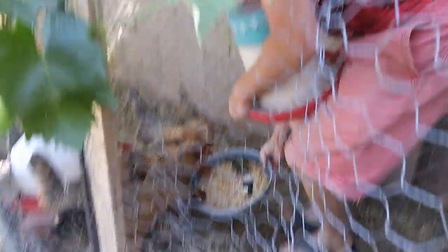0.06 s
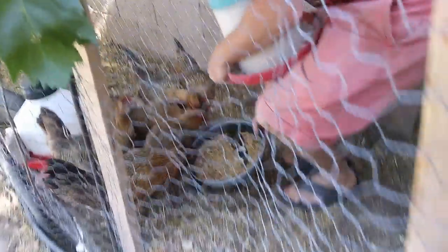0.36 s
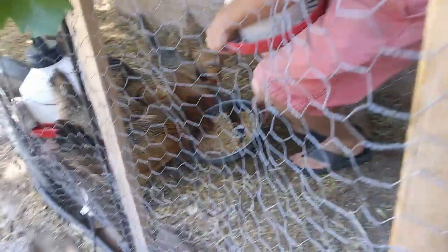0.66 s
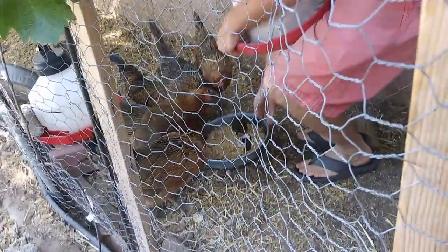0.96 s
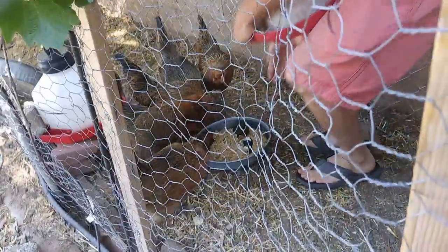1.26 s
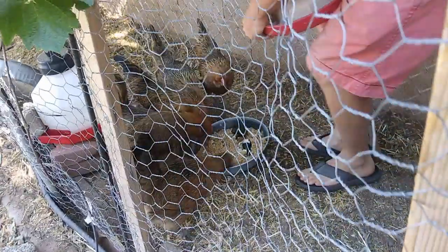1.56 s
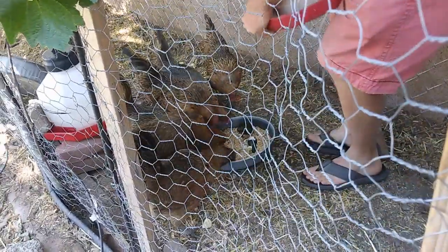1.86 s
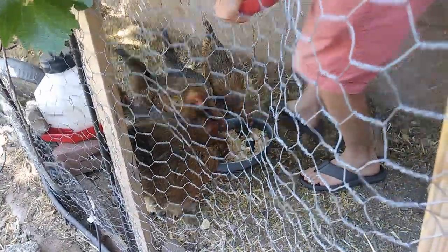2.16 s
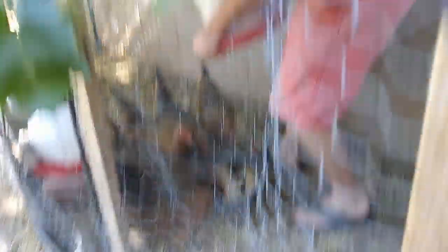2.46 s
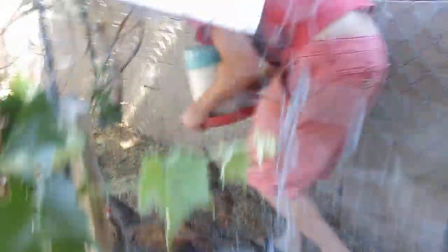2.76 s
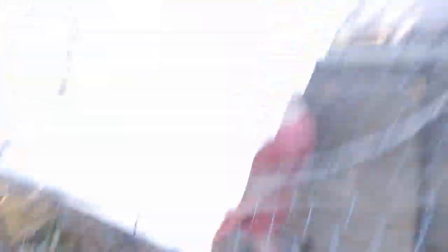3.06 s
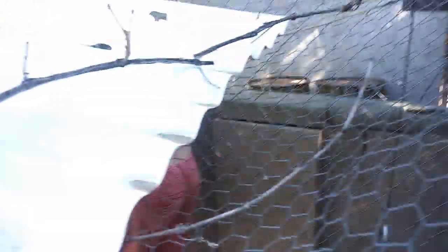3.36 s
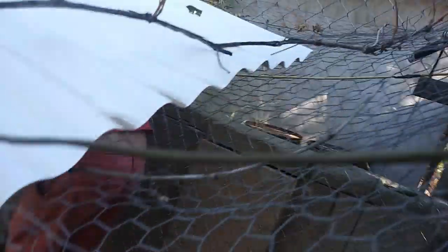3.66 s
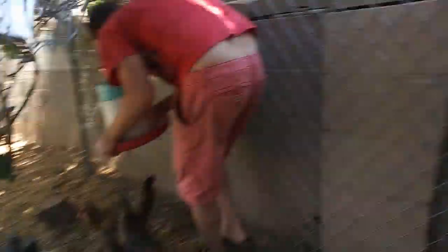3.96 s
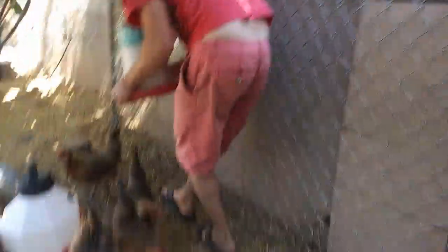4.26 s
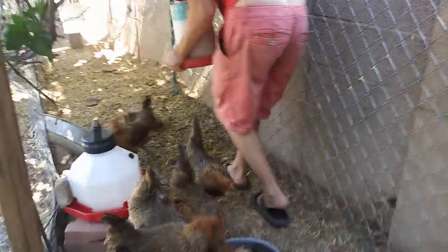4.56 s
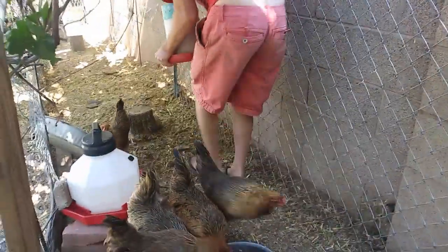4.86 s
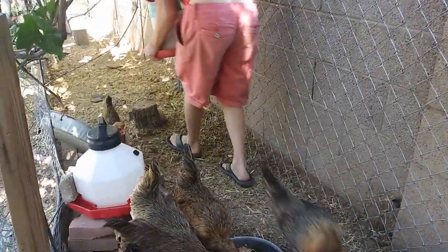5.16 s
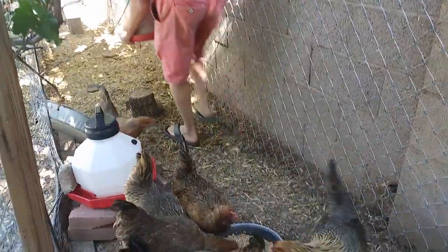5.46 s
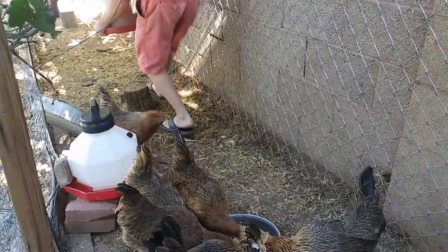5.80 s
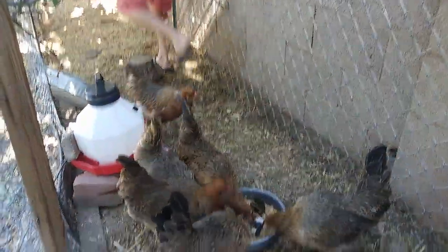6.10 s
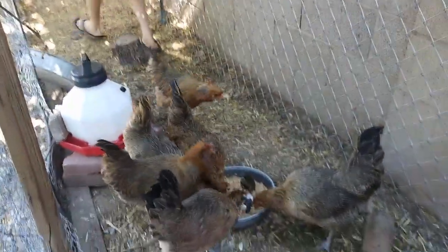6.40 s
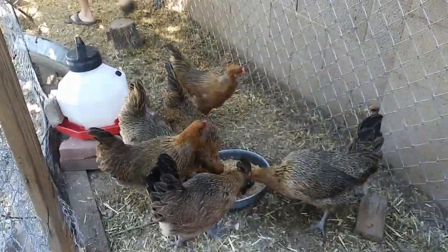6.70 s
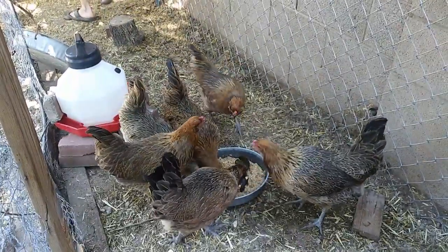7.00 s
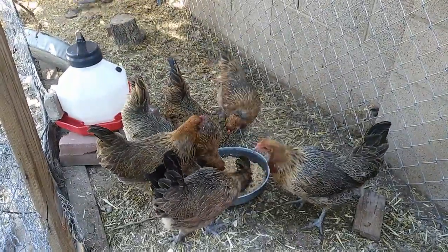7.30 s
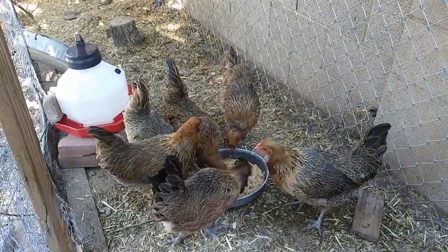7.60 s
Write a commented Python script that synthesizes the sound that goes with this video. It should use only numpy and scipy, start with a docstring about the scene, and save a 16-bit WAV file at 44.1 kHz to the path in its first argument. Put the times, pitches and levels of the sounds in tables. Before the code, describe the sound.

Scattered sharp taps, light pecking and thin chicken peeps outdoors, as sandals shuffle on dry straw and wire mesh rattles once.

```python
"""Young chickens feeding in a wire run

Beaks peck at grain and click on a bowl beside a block wall; the birds peep faintly and one clucks.
Sharp taps come from beaks and from the sandals of someone who shuffles off over crackling straw.
Halfway through, the wire fence rattles against the microphone.
Behind it all, a soft outdoor rush swells and sinks."""
import sys
import numpy as np
from scipy import signal
from scipy.fft import rfft, irfft, next_fast_len
from scipy.io import wavfile

SR = 44100
rng = np.random.default_rng(int(sys.argv[2]) if len(sys.argv) > 2 else 0)


def store_pcm(level_fs):
    """Save levels as 16-bit WAV."""
    pcm = np.round(np.clip(level_fs, -1, 1) * 32767).astype(np.int16)
    wavfile.write(sys.argv[1], SR, np.atleast_2d(pcm).T)


N = 345744
CUTOFF_HZ = 16000

# Each row: start in seconds, level in dB, brightness in dB per octave, lower and upper ring in Hz,
# and scattered sound compared with direct sound in dB.
TAPS = [(0.3994, -31, -1.1, 1630, 2620, -8.5), (0.5, -60, .3, 2460, 3460, 10),
        (1.0296, -38.5, 0.2, 1540, 3740, 8), (1.193, -45, -1.5, 1520, 3120, 1),
        (1.2051, -43.5, 3, 3130, 4380, -3), (2.4056, -50.5, -0.6, 1580, 3540, 18),
        (2.511, -56.5, 5, 2720, 3830, 18), (2.751, -46, 1, 3160, 4680, 6.5),
        (4.131, -55.5, -6.5, 900, 1380, 1), (5.2394, -33.5, 4.5, 2800, 3970, 7),
        (5.823, -48, -1.5, 730, 2000, 13), (6.372, -55, 5.5, 3130, 4260, 16),
        (6.5688, -46, 0.7, 1170, 3670, 0), (6.5721, -45, -1.1, 2960, 3600, -4),
        (7.586, -47.5, -1.9, 2680, 3560, 7)]
# The run's own resonances. Each row: pitch in Hz, width in Hz, strength in dB.
RUN_RESONANCES = [(873, 140, 7.5), (5020, 210, -3), (6950, 490, 2.5)]
# A tap's thud, clack, snap and crack (low to high), in dB.
TAP_SHAPE_DB = [-1, 0.4, 0.5, -7.5]


def taps(scatter_rise_s=0.00056, scatter_fade_s=0.064, tail_fade_s=0.18, tail_db=-21, bounce_s=0.0019):
    """A beak or sandal strikes: the thing hit rings, and the click bounces off ground, wall and coop."""
    out, t = np.zeros(N), np.arange(SR // 4) / SR
    for start, db, brightness_db, low_hz, high_hz, scatter_db in TAPS:
        build_up = 1 - np.exp(-t / (scatter_rise_s * from_db(scatter_db)))
        scatter = unit_energy(grains(14000, 0.55, len(t)) * build_up * fade(t, scatter_fade_s))
        tail = unit_energy(band(rng.standard_normal(len(t)), 220, 6700) * fade(t, tail_fade_s))
        scatter[round(bounce_s * SR * from_db(rng.uniform(-2, 2)))] += .45   # the ground bounce
        force = from_db(scatter_db) * add_resonances(scatter + from_db(tail_db) * tail, RUN_RESONANCES)
        force[0] += 1   # the direct click
        rings = [(hz, hz / 9, 9.2) for hz in (low_hz, high_hz)]
        levels_db = register_levels(db, brightness_db, TAP_SHAPE_DB, (low_hz, high_hz))
        add(out, start, impact(add_resonances(force, rings), levels_db))
    return out


# Hollow things ringing under two of the taps. Each row: pitch in Hz, level in dB, fade in seconds.
DEEP_HOLLOW = [(433, -33, 0.069), (960, -29, 0.04), (1196, -26, 0.043)]
HIGH_HOLLOW = [(973, -31.5, 0.11), (1790, -26, 0.071), (2765, -19, 0.056)]


def hollow_ring(start, tones, rise_s=0.0039):
    """A struck hollow object: its tones build up over a few cycles and die quickly."""
    out, t = np.zeros(N), np.arange(SR // 4) / SR
    ringing = sum(from_db(db) * fade(t, fade_s) * np.sin(2 * np.pi * hz * t) for hz, db, fade_s in tones)
    add(out, start, (1 - np.exp(-t / rise_s)) * ringing)
    return out


# Wire knocks. Each row: start in seconds, level in dB, brightness in dB per octave, fade in seconds.
FENCE_KNOCKS = [(3.9369, -24.5, -0.5, 0.015), (3.946, -37, 1, 0.01), (3.955, -30.5, 1, 0.044),
                (3.966, -37, 1, .036), (3.976, -29, 3.5, 0.018), (3.9781, -26.5, -1.5, 0.007),
                (4.007, -47.5, 3.5, .008)]
# How the fence rings. Each row: pitch in Hz, width in Hz, strength in dB.
FENCE_RESONANCES = [(700, 57, 1), (1160, 300, 4), (2660, 250, 7.5), (7240, 1800, 6.5)]
# A knock's thud, clack, snap and crack, in dB.
KNOCK_SHAPE_DB = [-6, 0, -4, -8]


def fence(drag_db=-23, drag_fade_s=0.093, shiver_db=-47, shiver_fade_s=0.7, zing_hz=10330, zing_db=-55):
    """Wire catches and drags in short dry crunches, then the mesh shivers and a sliding strand sings."""
    out, t = np.zeros(N), np.arange(SR // 2) / SR
    for start, db, brightness_db, fade_s in FENCE_KNOCKS:
        catch_and_drag = fade(t, fade_s) + from_db(drag_db) * fade(t, drag_fade_s)
        force = unit_energy(grains(12000, 2.7, len(t)) * catch_and_drag)
        force[0] += .5
        levels_db = register_levels(db, brightness_db, KNOCK_SHAPE_DB)
        add(out, start, impact(add_resonances(force, FENCE_RESONANCES), levels_db))
    mesh = rms_one(band(rng.standard_normal(len(t)), 560, 2900))
    add(out, 3.98, from_db(shiver_db) * fade(t, shiver_fade_s) * mesh)
    swell = np.hanning(int(0.082 * SR))
    add(out, 4.033, from_db(zing_db) * swell * np.sin(2 * np.pi * zing_hz * t[:len(swell)]))
    return out


# The clearer pecks and cracking stalks. Each row: start in seconds, level in dB, ring in Hz.
PECKS = [(0.167, -37.5, 3460), (0.4786, -40, 7750), (1.1678, -27.5, 3950), (1.4378, -36, 3600),
         (1.4596, -36, 2000), (3.199, -41, 5560), (3.3722, -40, 6700), (3.6283, -36, 2740),
         (3.8873, -38, 2730), (4.5241, -34.5, 4660), (5.084, -42, 8860), (5.6982, -42.5, 4470),
         (5.8007, -39.5, 2470), (5.8418, -35.5, 12500), (6.972, -48, 9500), (7.0263, -43, 6200),
         (7.047, -42, 9000), (7.0711, -37, 9400), (7.1756, -34, 3850), (7.625, -45, 10000)]
# A peck's tone colour. Each row: frequency in Hz, level in dB.
PECK_COLOUR = [(800, -17), (2000, 7.5), (4500, 2.5), (5700, 1.5), (10000, 3), (16000, -7.5)]


def pecks(spill_fade_s=0.069, ring_width_hz=380, ring_db=9):
    """A beak hits the feed: a pitched tick, then a small spill of grain."""
    out, t = np.zeros(N), np.arange(SR // 8) / SR
    for start, db, ring_hz in PECKS:
        spill = unit_energy(grains(4000, 0.81, len(t)) * fade(t, spill_fade_s))
        spill[0] += .25   # the tick
        ringing = add_resonances(spill, [(ring_hz, ring_width_hz, ring_db)])
        add(out, start, 5 * from_db(db - 1) * unit_energy(coloured(ringing, PECK_COLOUR)))
    return out


# Dry, woody clicks. Each row: start in seconds, peak level in dB, ring in Hz.
BOWL_CLICKS = [(0.4928, -32.5, 3200), (3.3605, -39, 1990), (3.4904, -40, 2900), (6.1325, -41, 3300),
               (6.6333, -42, 1650), (6.8738, -39, 1960), (7.071, -40.5, 1600), (7.3402, -40, 1750),
               (7.3897, -44, 1850)]


def bowl_clicks(scatter_db=-2, scatter_fade_s=0.045, ring_db=11):
    """A beak strikes the bare bowl and rings it for a few cycles, with a little scatter after."""
    out, t = np.zeros(N), np.arange(SR // 8) / SR
    for start, db, hz in BOWL_CLICKS:
        force = from_db(scatter_db) * unit_energy(grains(9000, .5, len(t)) * fade(t, scatter_fade_s))
        force[0] += 1
        click = band(add_resonances(force, [(hz, hz / 5, ring_db)]), 1050, 4500)
        add(out, start, from_db(db) * click / np.abs(click).max())
    return out


# Each row: start and length in seconds, first, middle and last pitch in Hz, level in dB.
PEEPS = [(1.38, 0.046, 3800, 4520, 4380, -45), (1.463, 0.034, 3700, 4550, 4300, -46),
         (4.404, 0.08, 2640, 2490, 2570, -57), (4.89, 0.11, 2800, 2660, 2640, -58),
         (5.304, .078, 2750, 2460, 2450, -53.5), (5.501, 0.059, 2180, 2300, 2280, -57.5),
         (5.92, 0.06, 3480, 3160, 2820, -55), (5.983, 0.093, 3200, 2740, 2030, -52),
         (6.087, 0.071, 2510, 2654, 2580, -53.5)]


def peeps(rasp_below_hz=850, rasp_full_db=-46, echo_db=-2.5, echo_fade_s=0.15):
    """Thin gliding whistles, smeared by the wall; a loud one splits off a ragged lower tone."""
    out = np.zeros(N)
    for start, length_s, first_hz, middle_hz, last_hz, db in PEEPS:
        hoarseness = 0.018 + 0.016 * abs(np.log2(last_hz / first_hz))   # a wider glide flutters more
        size = int(length_s * SR)
        progress = np.linspace(0, 1, size)
        glide_hz = np.polyval(np.polyfit([0, .5, 1], [first_hz, middle_hz, last_hz], 2), progress)
        hz = glide_hz * (1 + hoarseness * drift(693, size))
        rasp_hz = hz - rasp_below_hz * (1 + .5 * drift(1500, size))
        rasp = .6 * min(1, from_db(db - rasp_full_db) ** 2) * tone(rasp_hz)
        swell = np.sqrt(np.abs(np.sin(np.pi * progress)) / 2) * (1 + .45 * drift(500, size))
        add(out, start, from_db(db) * swell * (tone(hz) + rasp))
    t = np.arange(SR // 5) / SR
    echoes = unit_energy(grains(1500, 1.8, len(t)) * fade(t, echo_fade_s))
    return out + from_db(echo_db) * signal.fftconvolve(out, echoes)[:N]


def cluck(start=7.455, length_s=0.043, pitch_hz=228, throat_hz=450, width_hz=130, db=-56):
    """One soft, low cluck: a few uneven pulses ring in the throat."""
    out, size = np.zeros(N), int(length_s * SR)
    cycles = np.floor(np.cumsum(pitch_hz * (1 + 0.03 * drift(240, size))) / SR)
    pulses = np.diff(cycles, prepend=0)
    voice = resonate(resonate(pulses, throat_hz, width_hz), throat_hz, 2 * width_hz)
    add(out, start, from_db(db) * np.hanning(size) * rms_one(voice))
    return out


# Weight pressing on straw, and a sole scraping the ground. Each row: peak time in seconds,
# level in dB, seconds to swell by 10 dB, seconds to fall by 10 dB.
SHUFFLES = [(.17, -58.5, 0.14, 0.19), (1.04, -58, 0.11, 0.098), (1.47, -72, 0.19, 0.12),
            (1.79, -58, 0.35, 0.053), (2.5, -66, 0.39, 0.58), (2.87, -65.5, 0.063, 0.78),
            (3.68, -60.5, 0.21, 1), (4.02, -55, 0.061, 0.11), (5.18, -60, 0.19, 0.23),
            (6.12, -68, 0.41, 0.056), (6.55, -52, 0.046, 0.084), (7.13, -61, 0.09, 0.075)]
SCRAPES = [(1.03, -52.5, .16, 0.066), (1.17, -53, 0.073, 0.012), (1.47, -54.5, 0.067, 0.12),
           (1.76, -68, 0.12, .05), (2.86, -59, .04, 0.039), (3.5, -54, 0.014, 0.027)]
# Their tone colours. Each row: frequency in Hz, level in dB.
STRAW_COLOUR = [(900, -25), (2200, 8.5), (4400, 2.5), (5700, -1.5), (10000, 1.5), (16000, -12)]
SCRAPE_COLOUR = [(1200, -25), (2400, -10), (3200, -4), (4600, -6.5), (5500, -17), (12000, -21)]


def feet(bursts_per_s=55, burst_s=.003, straw_floor_db=-78):
    """Dry stalks give way in tiny bursts of crackle; grit rasps under a sliding sole."""
    bursts = signal.lfilter([1], [1, -np.exp(-1 / (burst_s * SR))], np.abs(grains(bursts_per_s, .5, N)))
    crackle = grains(7000, 2, N) * (1 + 1.5 * np.minimum(bursts, 1.5))
    straw_gain = np.hypot(stroke_gain(SHUFFLES), from_db(straw_floor_db))
    straw = straw_gain * rms_one(coloured(crackle, STRAW_COLOUR))
    grit = stroke_gain(SCRAPES) * rms_one(coloured(grains(6400, 1.6, N), SCRAPE_COLOUR))
    return straw + grit


def stalks(snaps_per_s=45, fade_s=.016, relative_db=-5.5):
    """Single dry stalks and husks snap under each shuffle, each with a crisp tick."""
    t = np.arange(SR // 50) / SR
    snaps = signal.fftconvolve(grains(snaps_per_s, 0, N), fade(t, fade_s))[:N]
    ticks = rms_one(band(snaps * rng.standard_normal(N), 2500, 11000))
    return from_db(relative_db) * stroke_gain(SHUFFLES) * ticks


def kernels(level_db=-74, width_hz=520):
    """Loose kernels tick faintly against beaks and bowl, each at a pitch of its own."""
    pitches_hz = np.geomspace(1400, 3800, 12)
    ticks = sum(resonate(grains(4, 1, N) + 1e-18, hz, width_hz) for hz in pitches_hz)
    return from_db(level_db) * rms_one(ticks)


# How the rush swells and sinks. Each row: time in seconds, level in dB.
RUSH_LEVELS = [(0.0, -57.5), (0.83, -58.5), (1.37, -51), (2.01, -56.5), (2.75, -52.5), (3.34, -54),
               (3.69, -51), (4.11, -50), (4.67, -54), (5.17, -52.5), (5.52, -56), (7.84, -56)]
# Tone colours of the background. Each row: frequency in Hz, level in dB.
RUMBLE_COLOUR = [(30, -60), (80, -30.5), (120, -14), (180, -5), (235, 3), (290, 0), (370, 0), (460, 3),
                 (600, -5), (900, -28)]
RUSH_COLOUR = [(80, -53), (350, -15.5), (600, 4.5), (900, 5), (1150, 1.5), (1550, 1), (2000, -9),
               (3000, -15.5), (4600, -18.5), (5600, -28.5), (12000, -44)]
HISS_COLOUR = [(4600, 2), (5700, -17), (8300, -4), (10500, 3), (16000, -9)]


def outdoors(rumble_db=-58, rumble_follows=0.36, hum_hz=239, hum_db=-70, hiss_db=-74):
    """A distant town's rush, a rumble that partly follows it, a faint fan hum and a steady hiss."""
    rush_db = np.interp(np.arange(N) / SR, *np.transpose(RUSH_LEVELS))
    rumble = from_db(rumble_db + rumble_follows * (rush_db - rush_db.mean())) * noise(RUMBLE_COLOUR)
    rush = from_db(rush_db) * noise(RUSH_COLOUR)
    hum = from_db(hum_db) * rms_one(resonate(resonate(rng.standard_normal(N), hum_hz, 18), hum_hz, 18))
    return rumble + rush + hum + from_db(hiss_db) * noise(HISS_COLOUR)


# The borders, in Hz, of four pitch ranges (registers): thud, clack, snap and crack.
REGISTER_EDGES_HZ = [275, 1200, 2400, 5100, 12000]


def register_levels(db, brightness_db, shape_db, rings_hz=(), pivot_hz=2400, ring_lift_db=4.5):
    """A harder hit favours the high registers, and each ring lifts those within about an octave."""
    centres_hz = np.sqrt(np.multiply(REGISTER_EDGES_HZ[:-1], REGISTER_EDGES_HZ[1:]))
    nearness = sum(np.exp(-(np.log2(hz / centres_hz) / 0.9) ** 2) for hz in rings_hz)
    return db + np.array(shape_db) + brightness_db * np.log2(centres_hz / pivot_hz) + ring_lift_db * nearness


def impact(force, levels_db):
    """Filter a hit toward four register levels, each counted as energy spread over 10 ms."""
    colour = []
    for db, low, high in zip(levels_db, REGISTER_EDGES_HZ, REGISTER_EDGES_HZ[1:]):
        gain_db = db - 10 * np.log10(np.sum(band(force, low, high) ** 2) / (SR / 100))
        colour += [(low * 1.08, gain_db), (high / 1.08, gain_db)]
    # The microphone loses the lowest and highest sounds.
    return coloured(force, [(145, colour[0][1] - 30)] + colour + [(CUTOFF_HZ, colour[-1][1] - 11)])


def stroke_gain(strokes):
    """Each foot stroke swells to its peak and dies away; overlapping strokes add in power."""
    t, power = np.arange(N) / SR, 0
    for peak_s, db, swell_s, release_s in strokes:
        drop_db = 10 * np.maximum((peak_s - t) / swell_s, (t - peak_s) / release_s)
        power = power + from_db(db - np.minimum(drop_db, 100)) ** 2
    return np.sqrt(power)


def from_db(db):
    return 10 ** (np.asarray(db) / 20)


def fade(t, fade_s):
    """Die away by 60 dB every fade_s seconds."""
    return from_db(-60 * t / fade_s)


def tone(hz):
    return np.sin(2 * np.pi * np.cumsum(hz) / SR)


def rms_one(x):
    return x / np.sqrt(np.mean(x ** 2) + 1e-20)


def unit_energy(x):
    return x / np.sqrt(np.sum(x ** 2) + 1e-20)


def add(out, start, sound):
    """Mix a sound in at a start time in seconds."""
    at = max(0, round(start * SR))
    out[at:at + len(sound)] += sound[:N - at]


def drift(turns_per_s, size):
    """A random wander around zero."""
    points = rng.standard_normal(4096)
    return np.interp(np.arange(size) * turns_per_s / SR, np.arange(len(points)), points)


def grains(per_s, spread_db, size):
    """Random clicks of uneven strength."""
    clicks = rng.random(size) < per_s / SR
    return clicks * rng.standard_normal(size) * from_db(spread_db * np.minimum(rng.exponential(1, size), 4))


def band(x, low_hz, high_hz):
    return signal.sosfilt(signal.butter(2, [low_hz, high_hz], "band", fs=SR, output="sos"), x + 1e-18)


def resonate(x, hz, width_hz):
    """Keep only what rings near one pitch."""
    r = np.exp(-np.pi * width_hz / SR)
    feedback = [1, -2 * r * np.cos(2 * np.pi * hz / SR), r * r]
    return signal.lfilter(np.array([1, 0, -1]) * (1 - r * r) / 2, feedback, x)


def add_resonances(x, resonances):
    for hz, width_hz, db in resonances:
        x = x + from_db(db) * resonate(x, hz, width_hz)
    return x


def coloured(x, colour):
    """Filter through (Hz, dB) points, with no ringing ahead of a click (minimum phase)."""
    size = 2 * next_fast_len(len(x) // 2 + SR // 10)
    hz, db = np.transpose(colour)
    grid_hz = np.maximum(np.fft.rfftfreq(size, 1 / SR), 1)
    cepstrum = irfft(np.log(from_db(np.interp(np.log(grid_hz), np.log(hz), db))))
    fold = 1 + np.sign(np.arange(size // 2))
    response = np.exp(rfft(cepstrum[:size // 2] * fold, size))
    return irfft(rfft(x, size) * response)[:len(x)]


def noise(colour):
    return rms_one(coloured(rng.standard_normal(N), colour))


def scene():
    """Knocks, birds, footsteps and background, mixed into one channel."""
    knocks = taps() + hollow_ring(0.4, DEEP_HOLLOW) + hollow_ring(5.241, HIGH_HOLLOW) + fence()
    birds = pecks() + bowl_clicks() + kernels() + peeps() + cluck()
    return (knocks + birds + feet() + stalks() + outdoors())[None]


def record(dry):
    """The highest treble is cut off steeply."""
    return signal.sosfilt(signal.ellip(10, .1, 80, CUTOFF_HZ, fs=SR, output="sos"), dry)


dry = scene()
out = record(dry)
store_pcm(out)
```